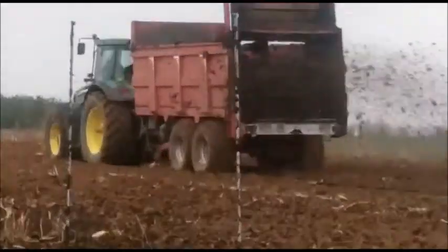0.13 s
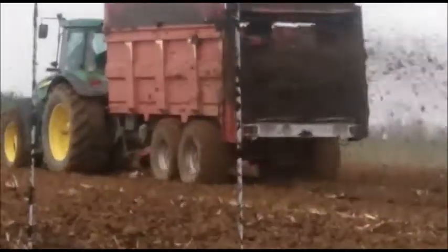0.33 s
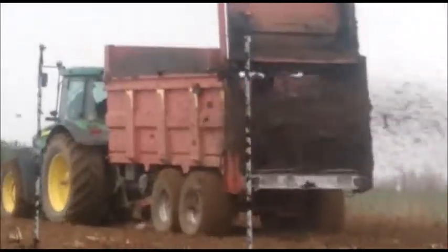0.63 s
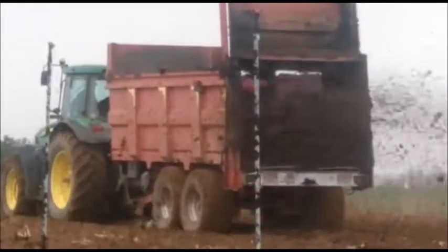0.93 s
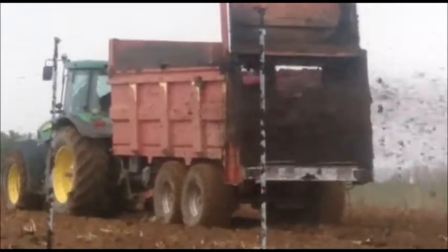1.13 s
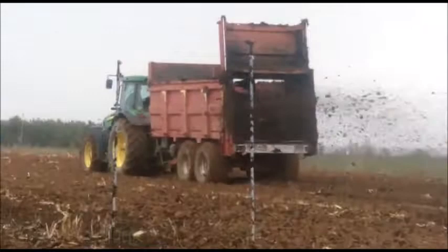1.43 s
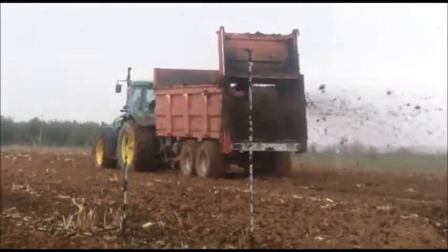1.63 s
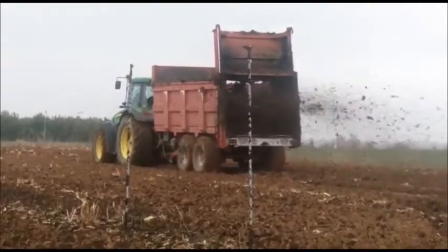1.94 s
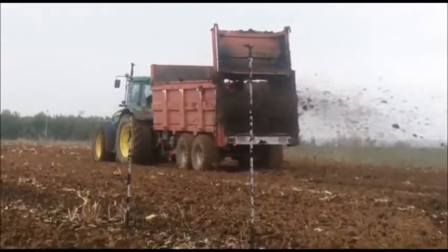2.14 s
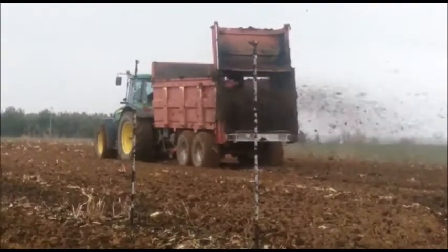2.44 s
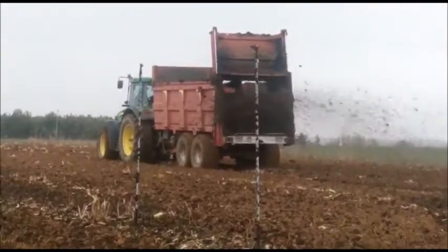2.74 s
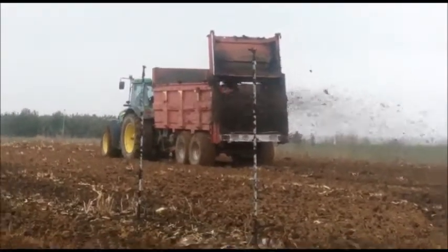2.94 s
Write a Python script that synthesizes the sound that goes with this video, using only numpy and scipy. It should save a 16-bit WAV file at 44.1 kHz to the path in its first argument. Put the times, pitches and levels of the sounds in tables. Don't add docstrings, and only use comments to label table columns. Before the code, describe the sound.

A manure spreader clatters continuously, clods and stones banging its steel sides several times a turn, with rattling links, hissing spray and a low tractor drone; open windy field, hand-held phone at some distance.

```python
import sys
import numpy as np
from scipy import signal
from scipy.fft import rfft, irfft
from scipy.io import wavfile
from scipy.ndimage import uniform_filter1d

SR = 44100
rng = np.random.default_rng(int(sys.argv[2]) if len(sys.argv) > 2 else 0)


def bounce(signal):
    frames = np.transpose(np.atleast_2d(signal))
    limited = np.clip(frames, -1, 1)
    pcm = np.round(limited * 32767).astype(np.int16)
    wavfile.write(sys.argv[1], SR, pcm)


def ratio(d):
    e = np.asarray(d, float) / 20
    return 10 ** e


N = 135828
F = np.arange(N // 2 + 1) * SR / N + 1e-3

# frequency in Hz, gain in dB.
PANEL_COLOUR = [(250, -38.5), (500, -24.5), (1150, -18), (1400, -2), (2500, -8.5), (3400, -3.5),
                (7000, -9.5), (16000, -25.5)]


def unit(x):
    return x / np.sqrt(np.mean(x ** 2))


def shape(points):
    p = np.array(points, float)
    return ratio(np.interp(np.log(F), np.log(p[:, 0]), p[:, 1]))


def colour(x, points):
    cepstrum = irfft(np.log(shape(points)), N)
    cepstrum[1:N // 2] *= 2
    cepstrum[N // 2 + 1:] = 0
    return irfft(rfft(x) * np.exp(rfft(cepstrum)), N)


def walk(rate):
    k = int(SR / rate)
    steps = np.repeat(rng.standard_normal(N // k + 1), k)
    return unit(uniform_filter1d(uniform_filter1d(steps, k), k)[:N])


def fade(t, t60):
    return np.exp(-np.log(1000) * t / np.maximum(t60, .002))


def panel_ring(t, t60, pick):
    hz = 500 * 20 ** pick[:, :1]
    gain = ratio(10 * (pick[::-1, 1:2] - .5)) * np.sqrt(hz / 2000)
    decay = fade(t, 0.94 * t60 * (.5 + pick[:, 2:]) * np.sqrt(2000 / hz))
    return (gain * np.sin(2 * np.pi * (hz * t + pick[:, 1:2])) * decay).sum(axis=0) / 4


def box_thud(t, t60, pick):
    # mode frequency in Hz, level in dB.
    box_modes = [(570, -0.5), (665, 1), (830, -1.5), (965, -1), (1090, 0), (1340, -7.5), (1570, -10)]
    hz, db = np.array(box_modes, float).T[:, :, None]
    hz = hz * (1 + .06 * (pick[:7, 2:] - .5))
    return (ratio(db) * np.sin(2 * np.pi * (hz * t + pick[:7, :1])) * fade(t, 2.17 * t60)).sum(axis=0)


def impact(t, bright_db, ms, thud_db):
    t60, bits = ms / 1000, rng.standard_normal(128)
    noise, pick = rng.standard_normal((2, len(t))), rng.random((28, 3))
    crumble = ratio(4.5 * np.interp(t, np.arange(128) * 0.00287, bits))
    x = noise[0] * fade(t, t60)
    x = x + crumble * ratio(-10) * noise[1] * fade(t, 3.83 * t60)
    x = x + ratio(-2) * panel_ring(t, t60, pick)
    x = x + ratio(-10 + thud_db) * box_thud(t, t60, pick)
    x = x * np.minimum(1000 * t / 1.6, 1)
    x = x + ratio(-4.5) * noise[1, ::-1] * fade(t, 0.0054)
    tilt_db = bright_db + 13.5
    dull = signal.lfilter(*signal.butter(1, 2620, fs=SR), x)
    edge_hz = min(10200 * np.exp(0.46 * tilt_db), .45 * SR)
    bright = signal.lfilter(*signal.butter(1, edge_hz, fs=SR), x - dull)
    return dull + ratio(tilt_db) * bright


def blows():
    # start in seconds, peak in dB, brightness in dB, decay in ms, thud in dB.
    clods = [(0.0054, -22.5, -12, 46, -4), (0.0982, -29, -6, 41, -1.5), (0.1745, -25.5, -15, 39, -1),
             (0.1909, -25, -10, 45, 3), (0.344, -22, -12.5, 42, -2.5), (0.3744, -26, -16, 83, -4),
             (0.5634, -21.5, -10, 34, 0.5), (0.6525, -28.5, -2, 58, -0.5), (0.7314, -34.5, -2, 52, 0),
             (0.7465, -23.5, -13.5, 68, 2), (0.7577, -25, -7.5, 53, 6), (0.828, -24, -6.5, 48, 3),
             (0.9105, -28, -7.5, 66, 1), (0.9356, -20.5, -13.5, 44, 1.5), (0.9697, -24, -15, 38, 0.5),
             (1.1026, -26.5, -11, 57, 5), (1.1182, -19.5, -13, 29, 3.5), (1.29, -27.5, -14.5, 47, 3.5),
             (1.3084, -20.5, -14.5, 33, 1), (1.4745, -26, -22, 74, -2.5), (1.495, -20.5, -13, 28.5, -0.5),
             (1.6606, -28.5, -15, 87, 4), (1.6796, -19.5, -13, 27, -1.5), (1.8485, -24.5, -19, 34, -1),
             (1.8666, -23, -18, 34, 2), (2.0528, -22.5, -11, 40, 1), (2.4184, -23, -22, 48, 2),
             (2.6102, -30, -9.5, 66, 2.5), (2.7961, -20, -13.5, 60, -2), (2.9822, -21, -16.5, 42, -3)]
    # start in seconds, peak in dB, brightness
    # in dB.
    stones = [(0.0274, -26, -18), (0.0427, -24.5, -10), (0.204, -20.5, -11), (0.285, -27, -13),
              (0.3674, -23, -14), (0.403, -31, -10), (0.412, -20.5, -12.5), (0.4613, -26.5, -12.5),
              (0.4841, -37, -1), (0.5462, -26.5, -6.5), (0.5542, -24, -19), (0.587, -27, -9),
              (0.598, -23, -8.5), (0.6858, -23, -32), (0.8184, -26.5, -13), (0.8504, -23, -23),
              (0.9208, -18, -25), (0.9493, -37.5, 2), (0.9557, -20, -16), (1.043, -34.5, -4),
              (1.145, -35, -10), (1.1561, -19, -16), (1.171, -30, -15), (1.3416, -19, -14.5),
              (1.5073, -33, -5.5), (1.65, -36, -10), (1.6964, -30, -20), (1.7749, -37, -10.5),
              (1.8747, -24.5, -7), (1.9372, -39.5, -3),
              (1.9195, -27, -20), (2.0333, -25, -9.5), (2.079, -25.5, -8.5), (2.0986, -31.5, -2.5),
                   (2.123, -31, -10), (2.167, -26, -11), (2.2348, -26, -15), (2.2479, -23.5, -12),
                   (2.2671, -31, -11), (2.315, -33.5, -9), (2.433, -21, -13), (2.453, -25, -13),
                   (2.501, -32, -15), (2.5514, -31.5, -7), (2.592, -24.5, -9.5), (2.6214, -31, -3.5),
                   (2.6371, -28.5, -6.5), (2.652, -39, -14), (2.6885, -33, -6.5), (2.7604, -24, -17),
                   (2.7776, -21, -8), (2.8228, -24.5, -7.5), (2.8454, -31, -8), (2.94, -26.5, -18),
                   (2.9632, -25, -12), (2.9984, -35.5, 0), (3.009, -35.5, -2.5), (3.022, -39, 1),
              (0.663, -23, -12), (0.672, -29, -8), (0.7407, -26, -9), (0.7644, -22, -18), (0.8354, -21, -4),
              (0.881, -36, -10), (0.894, -36, -6), (0.927, -22, -15), (0.964, -34, -8), (1.1085, -25, -17),
              (1.1229, -16, -16), (1.1375, -41, -11), (1.298, -27.5, -14), (1.42, -31, -15),
              (1.465, -39, -16), (1.4838, -27, -29), (1.489, -34, -18), (1.515, -40, -9), (1.5467, -36, -7),
              (1.6097, -37, -11), (1.832, -45, -18), (2.064, -29, -13), (2.13, -38, -12),
              (2.4227, -28, -12), (2.806, -25, -11), (2.8733, -42, -10), (2.9228, -42, -11),
              (2.976, -25.5, -11), (2.992, -24, -13), (0.5883, -27.5, -7)]
    small = [tuple(row) + (17.1, 0) for row in stones]
    hits, t = np.zeros(N + 8192), np.arange(8192) / SR
    for start_s, peak_db, bright_db, ms, thud_db in clods + small:
        i = int(start_s * SR)
        hits[i:i + 8192] += ratio(peak_db) * impact(t, bright_db, ms, thud_db)
    return hits[:N]


def rattle(t):
    # time in seconds, level in dB.
    beater_load = [(0.0, -48.5), (0.5, -49.5), (3.08, -51)]
    # frequency in Hz, gain in dB.
    spray_colour = [(250, -20.5), (600, -4.5), (1150, -2.5), (1400, 3), (2500, -6), (3400, 0),
                    (9500, -10.5), (16000, -26.5)]
    turn_hz, turn_start_s, turn_depth_db = 6.2, 0.015, 7
    load_db = np.interp(t, *np.array(beater_load).T)
    angle = 2 * np.pi * turn_hz * (t - turn_start_s)
    swell = ratio(load_db + turn_depth_db * (2 * ((1 + np.cos(angle)) / 2) ** 2.25 - 1.5))
    clicks = (rng.random(N) < 1800 / SR) * ratio(2 * rng.exponential(size=N))
    envelope = signal.lfilter([1], [1, -fade(1 / SR, 0.0094)], clicks)
    links = unit(colour(envelope * rng.standard_normal(N), PANEL_COLOUR)) * swell * ratio(1.5)
    spray = unit(colour(rng.standard_normal(N), spray_colour))
    return links + spray * ratio(load_db + 5 + 0.72 * walk(8.24))


def engine():
    # resonance in Hz, width in Hz, level in dB.
    pipe_modes = [(61, 15, -15), (87.4, 11.4, 8.5), (135, 11, -16), (283, 36, -7.5), (387, 12, -48),
                  (579, 60, -11.5), (638.6, 20, -7)]
    # time in seconds, level in dB.
    engine_level = [(0.0, -48), (0.08, -50), (0.13, -61), (0.17, -52.5), (0.61, -59.5), (0.64, -66),
                    (0.69, -50.5), (1.53, -59.5), (1.57, -47.5), (1.79, -64), (1.83, -52), (1.89, -62.5),
                    (2.59, -55), (2.63, -68), (2.75, -56.5), (2.8, -58), (3.04, -59), (3.08, -68)]
    firing_hz = 91.3
    phase = np.cumsum(firing_hz * (1 + 0.01214 * walk(3)) / SR)
    k = phase.astype(int)
    cylinder_db = np.resize([1.0, -16.0, -8.0, -8, -1.0, -18.0], N // 100)
    strength = ratio(rng.standard_normal(N // 100) + cylinder_db)
    pulses = np.diff(k, prepend=0) * strength[k] + 0.048 * rng.standard_normal(N)
    body = sum(ratio(db) / (1 + 1j * (F - hz * hz / F) / w) for hz, w, db in pipe_modes)
    engine_db = np.interp(np.arange(N) / SR, *np.array(engine_level).T)
    return unit(irfft(rfft(pulses) * body, N)) * ratio(engine_db - 0.5)


def wind(t):
    # frequency in Hz, gain in dB.
    rumble = [(20, -29), (35, -13), (60, 3), (90, 0.5), (150, -10.5), (250, -16), (500, -21), (2000, -62.5)]
    # time in seconds, rise in dB, length in seconds, place from 0 (left) to 1 (right).
    buffets = [(0.05, 3.5, 0.081, 0.83), (0.508, 10.5, 0.03, 0.088), (0.64, -12, 0.018, 0.91),
               (0.692, -2, 0.021, 0.83), (1.58, 10.5, 0.068, 0.74), (1.88, 11, 0.017, 0),
               (2.1, 12.5, 0.017, 0), (2.4, 2, .04, 0.068), (2.75, 4, 0.021, .5), (1.382, 3, 0.027, 0.65),
               (0.928, 5.5, 0.038, 0.58), (1.05, 4, 0.033, 0.18)]
    ports, shared = [], rng.standard_normal(N)
    for port, port_db in enumerate((-51, -53)):
        gust_db = 3 * walk(9)
        for start_s, rise_db, length_s, place in buffets:
            nearness = np.clip(2 - 2 * abs(place - port), 0, 1)
            gust_db = gust_db + rise_db * nearness * np.exp(-((t - start_s) / length_s) ** 2)
        air = shared + rng.standard_normal(N)
        ports.append(unit(colour(air * ratio(gust_db), rumble)) * ratio(port_db))
    return np.array(ports)


def dips(notches):
    gains = [1 - np.clip(depth, 0, .95) / (1 + ((F - hz) / w) ** 2) for hz, w, depth in notches]
    return np.prod(gains, axis=0)


def through_ports(sound):
    # frequency in Hz, width in Hz, depth from 0 to 1.
    case_dips = [(4080, 76, 0.48), (7820, 146, 0.71), (9500, 480, 0), (11870, 710, 0.71), (14550, 520, 0.4)]
    # frequency in Hz, width in Hz, depth from 0 to 1.
    hand_dips = [(2172, 117, 1), (3900, 140, 0.1), (5060, 100, 0.2), (6400, 440, 1), (8400, 630, 0.6),
                 (10100, 1430, 0.87)]
    # frequency in Hz, gain in dB.
    shade = [(100, 3.5), (1000, 3.5), (1350, -1), (1750, 3.5), (2600, -3.5), (3300, -31.5), (8000, -13.5),
             (11000, -26.5)]
    # frequency in Hz, phase in radians.
    shade_phase = [(0, 0), (1000, -.95), (1250, -2.1), (1650, -1.9), (1980, -3.15), (2450, -3.1),
                   (2700, -4.7), (16000, -20)]
    case = dips(case_dips) * (F < 16900)
    right = rfft(sound) * case
    stray = rfft(sound * walk(300)) * case
    high = 1 / (1 + (2900 / F) ** 8)
    lag = np.exp(1j * np.interp(F, *np.array(shade_phase).T))
    left = right * lag + (high * ratio(8.5) + ratio(-11)) * stray
    left = left * dips(hand_dips) * shape(shade)
    return np.array([irfft(left, N), irfft(right, N)])


def scene():
    t = np.arange(N) / SR
    machine = colour(blows(), PANEL_COLOUR) * ratio(-1) * 2 + rattle(t) + engine()
    hiss = ratio(-84) * rng.standard_normal((2, N))
    return through_ports(machine) + wind(t) + hiss


def roll_off(x):
    return signal.sosfilt(signal.butter(12, 16960, fs=SR, output="sos"), x)


def record(dry):
    low_pass = signal.ellip(8, .2, 32, 15850, fs=SR, output="sos")
    mix = signal.sosfilt(low_pass, dry)
    return roll_off(mix)


dry = scene()
out = record(dry)
bounce(out)
```